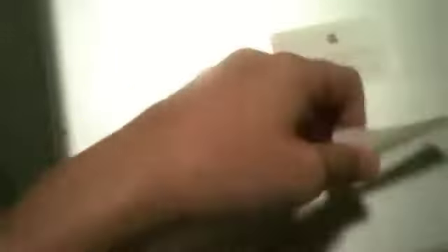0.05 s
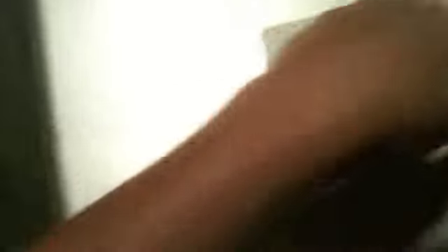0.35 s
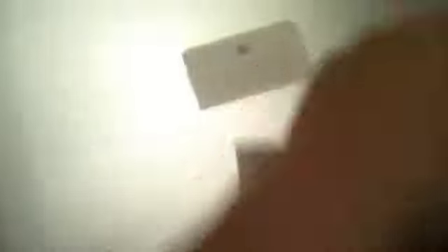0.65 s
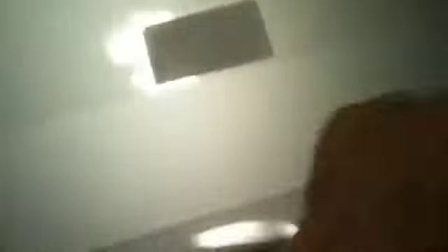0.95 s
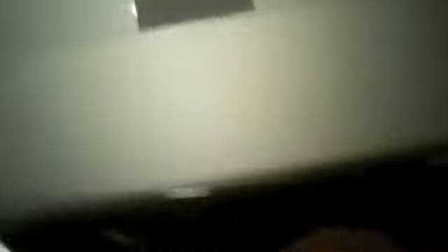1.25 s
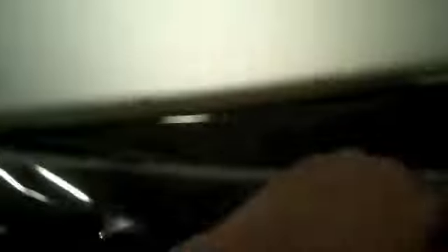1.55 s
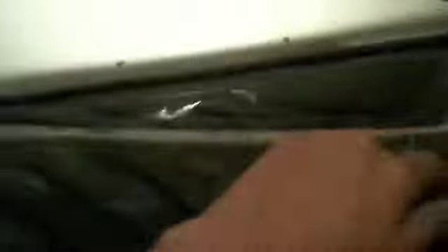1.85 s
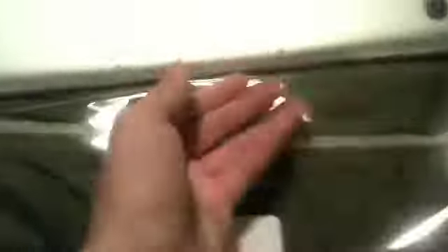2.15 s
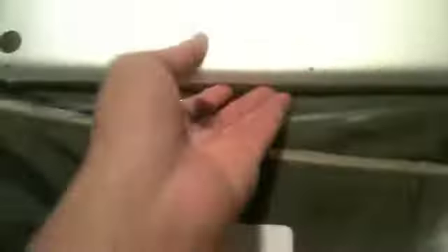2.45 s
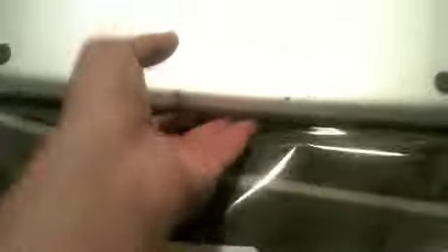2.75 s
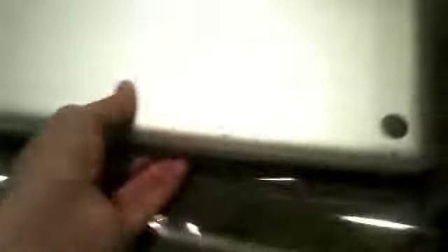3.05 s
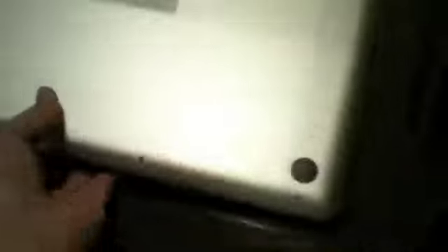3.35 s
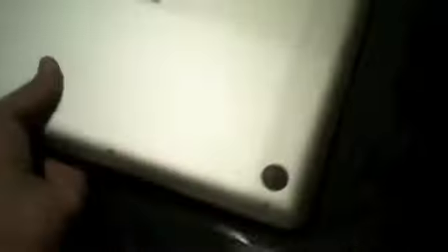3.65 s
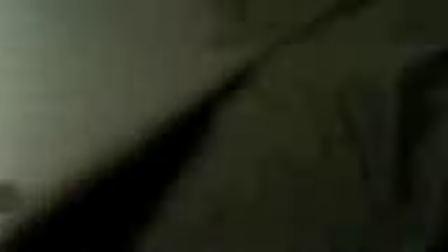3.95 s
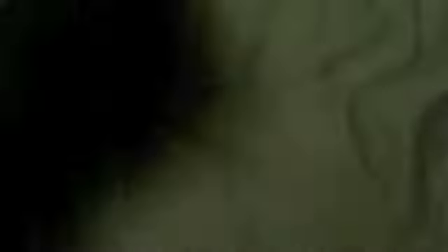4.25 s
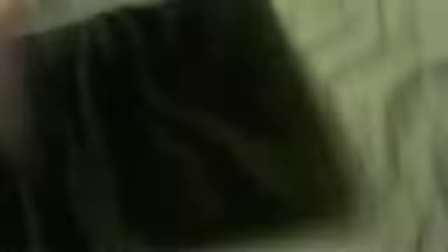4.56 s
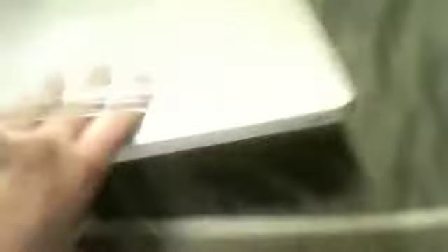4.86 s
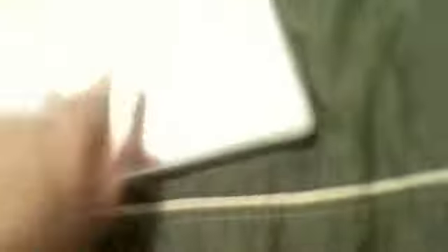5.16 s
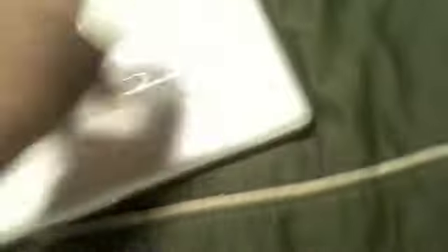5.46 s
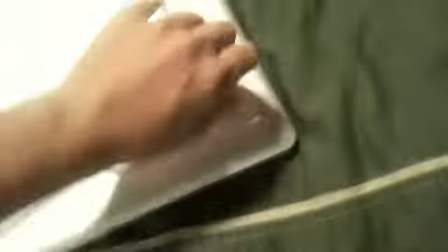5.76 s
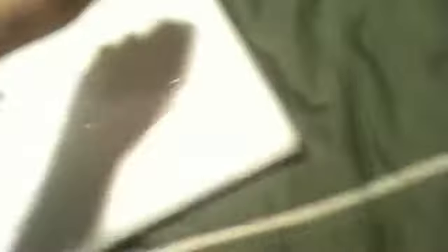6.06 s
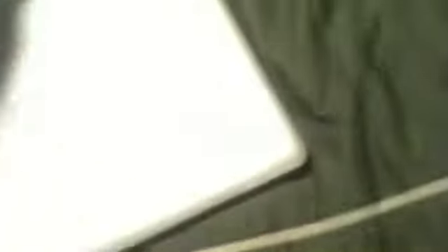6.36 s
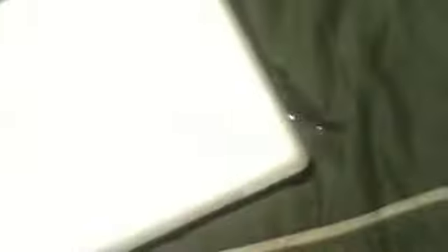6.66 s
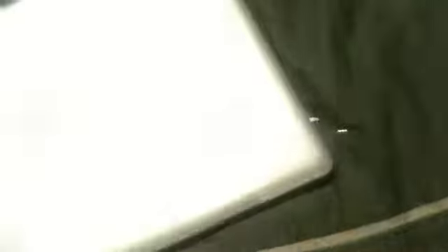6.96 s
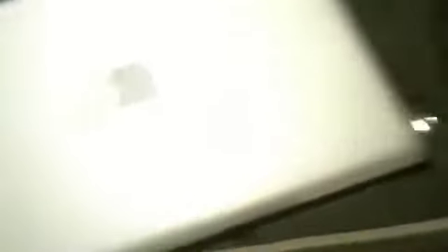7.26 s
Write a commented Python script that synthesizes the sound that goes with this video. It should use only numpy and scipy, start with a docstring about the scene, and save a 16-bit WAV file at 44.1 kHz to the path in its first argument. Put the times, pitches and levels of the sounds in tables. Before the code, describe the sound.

Three short sticky rips pull plastic film away from a laptop, mixed with bright, sharp cracks. Lighter scattered crinkles and a sliding hiss follow, pause briefly, then build into busy crackling as the case drags faintly on bedding. Fingers bump and tap the case with no ring. The sound is close and fairly dry in a small quiet room, and the loudest snaps slightly overload the microphone.

```python
"""Peeling protective film off a laptop

The laptop lies on a bed, close to a small microphone. The film's glued flap lets go in three stick-slip
rips; then the loose film snaps, crumples and slides, and fingers knock on the case. Hand movements bring
a hiss and a scatter of small creases. A small room answers, and the loudest cracks overload the mic."""
import sys
import numpy as np
from scipy import signal
from scipy.fft import rfft, irfft, next_fast_len
from scipy.io import wavfile
from scipy.ndimage import map_coordinates

SR = 44100
rng = np.random.default_rng(int(sys.argv[2]) if len(sys.argv) > 2 else 0)


def pcm_store(signal):
    """Save signal as 16-bit PCM."""
    levels = np.round(np.clip(np.atleast_2d(signal), -1, 1) * 32767)
    wavfile.write(sys.argv[1], SR, levels.astype(np.int16).T)


N = 322371
TIME = np.arange(N) / SR
GRAIN = 2048  # samples in one crease or knock
GRAIN_TIME, GRAIN_HZ = np.arange(GRAIN) / SR, np.fft.rfftfreq(GRAIN, 1 / SR)
TOP_HZ = 15900  # the microphone's band limit
SMALL_FLUTTER_DB = -17  # small creases leave little flutter behind

# the hands at work on the film: (start [s], end [s], typical crease [dB], sliding hiss [dB])
HAND_MOVES = [(0, 0.386, -66, -57), (0.455, 0.584, -50, -58.5), (.76, 0.898, -40.5, -51),
              (1.049, 1.195, -38, -54), (1.27, 1.486, -58, -54), (1.492, 1.656, -43.5, -60),
              (1.866, 2.733, -57.5, -68.5), (2.8, 4.03, -50, -59.5), (4.028, 4.164, -66, -54),
              (4.607, 4.982, -66, -61.5), (5.007, 5.22, -36, -50), (5.218, 5.46, -31.5, -43),
              (5.598, 5.72, -40, -53), (5.77, 5.876, -40.5, -54.5), (5.932, 6.161, -39.5, -56),
              (6.16, 7.034, -55.5, -71), (6.667, 6.707, -69, -49.5), (7.043, 7.307, -40, -47)]


def amp(db):
    """Decibels to gain."""
    return 10 ** (np.asarray(db) / 20)


def along(points, hz):
    """Read (frequency [Hz], value) points on a log frequency axis."""
    freqs, values = np.transpose(points)
    return np.interp(np.log(hz + 1), np.log(freqs), values)


def wobble(rate):
    """A smooth random curve with `rate` knots a second."""
    return map_coordinates(rng.standard_normal(int(N * rate / SR) + 4), [TIME * rate])


def filtered(x, gain):
    """Equalise x with the curve gain(hz)."""
    size = next_fast_len(N + SR // 2)
    return irfft(rfft(x, size) * gain(np.fft.rfftfreq(size, 1 / SR)), size)[:N]


def noise(spectrum):
    """Coloured noise of rms 1."""
    x = filtered(rng.standard_normal(N), lambda hz: amp(along(spectrum, hz)))
    return x / x.std()


def causal(gain):
    """The minimum-phase response with this gain: nothing rings ahead of the attack."""
    cepstrum = irfft(np.log(gain))
    index = np.arange(GRAIN)
    fold = 1 + np.sign(GRAIN / 2 - index) - (index == 0)
    return np.exp(rfft(cepstrum * fold))


def resonance(centre_hz, q):
    """One band-pass response for each centre frequency."""
    s = 1j * GRAIN_HZ / centre_hz[:, None]
    return s / q / (1 + s / q + s * s)


def placed(times, db, grains):
    """Lay grains out in time, each with the energy of 2 ms at its level."""
    gain = amp(db) * np.sqrt(.002 * SR / np.sum(grains ** 2, axis=1))
    index = np.round(np.abs(times) * SR).astype(int)[:, None] + np.arange(GRAIN)
    return np.bincount(index.ravel(), (grains * gain[:, None]).ravel(), N)[:N]


def room_tone():
    """The faint, low air of a quiet bedroom."""
    # colour of the air: (frequency [Hz], relative density [dB])
    air = [(30, -20.5), (80, -25.5), (150, 1), (330, -0.5), (700, -8.5), (2000, -15), (15500, -35)]
    return amp(-62) * noise(air)


def room(x, build_s=0.0045, count=8):
    """A short diffuse tail whose pattern changes as the film and microphone move."""
    # the room's decay: (frequency [Hz], time to fall 60 dB [s])
    decay = [(200, 0.12), (1500, 0.16), (6000, 0.14), (15000, 0.15)]
    hz, t, spectra = signal.stft(rng.standard_normal((count, SR // 3)), SR, nperseg=256)
    tails = signal.istft(spectra * amp(-60 * t / along(decay, hz)[:, None]), SR, nperseg=256)[1]
    tails *= 1 - np.exp(-np.arange(tails.shape[1]) / SR / build_s)
    tails /= np.linalg.norm(tails, axis=1, keepdims=True)
    position = (TIME * 10).astype(int) % count  # the next tail every 0.1 s
    return sum(signal.fftconvolve(x * (position == k), tail)[:N] for k, tail in enumerate(tails))


def dragging():
    """The case drags on the bedding with a grainy rustle."""
    # swell of the drag: (time [s], level [dB])
    swell = [(4.55, -83.5), (4.86, -55), (5.15, -57), (5.38, -55), (5.7, -60), (6, -80)]
    # colour of the rubbed cloth: (frequency [Hz], relative density [dB])
    cloth = [(60, -31.5), (300, -13), (800, -1.5), (1400, -8), (2500, -16.5), (9000, -27)]
    return amp(np.interp(TIME, *np.transpose(swell)) + 0.81 * wobble(68)) * noise(cloth)


def stroke(start, end, db, rise_db_per_s=700, fall_db_per_s=169):
    """The envelope of one hand movement: it rises quickly, holds, and dies as the film comes to rest."""
    early, late = np.maximum(start - TIME, 0), np.maximum(TIME - end, 0)
    return amp(db - rise_db_per_s * early - fall_db_per_s * late)


def sliding(resting_db=-73):
    """Film hisses over the smooth case with each stroke, and never lies quite still."""
    # colour of the hiss: (frequency [Hz], relative density [dB])
    hiss = [(200, -24.5), (1000, -6.5), (3000, -8), (6500, -3.5), (10000, -4.5), (15500, -17.5)]
    strokes = np.max([stroke(start, end, db) for start, end, _, db in HAND_MOVES], axis=0)
    flicker = amp(1.3 * wobble(18) + 1.2 * wobble(300))
    return np.hypot(strokes, amp(resting_db)) * flicker * noise(hiss)


def pushes(count, life_s):
    """Spectra of soft contacts: noise bursts that swell and die away."""
    return rfft(rng.standard_normal((count, GRAIN)) * np.sqrt(GRAIN_TIME) * np.exp(-GRAIN_TIME / life_s))


def bumps():
    """The hands bump the padded case with a dull thud."""
    # soft bumps: (time [s], pitch [Hz], level [dB])
    thuds = [(1.475, 387, -38.5), (1.625, 263, -42.5), (1.879, 290, -35.5), (4.028, 427, -38.5),
             (5.38, 330, -34), (6.334, 263, -28.5), (6.929, 565, -41), (7.128, 1590, -25.5)]
    times, hz, db = np.transpose(thuds)
    return placed(times, db, irfft(pushes(len(times), life_s=0.0044) * resonance(hz, q=1.47) ** 2))


def knocks(crest_db=7):
    """A finger meets the case: a short dull tap with no ring."""
    # finger taps: (time [s], nominal peak [dB])
    taps = [(4.028, -24.5), (5.709, -21), (6.337, -18), (6.403, -21), (6.473, -32), (7.033, -18.5)]
    # tone of the knocked case: (frequency [Hz], gain [dB])
    case_tone = [(35, -25), (60, -17.5), (148, -1), (895, 6), (1030, 9), (1960, -1.5), (3340, -0.5),
                 (4110, -5.5), (7330, -2), (15000, -17)]
    times, peak_db = np.transpose(taps)
    case = causal(amp(along(case_tone, GRAIN_HZ)))
    return placed(times, peak_db - crest_db, irfft(pushes(len(times), life_s=0.0021) * case))


def jolts(count, life_s, flutter_db, flutter_s=0.0036):
    """Spectra of sudden releases of tension, each followed by a weaker flutter of the sheet."""
    lives = np.reshape(life_s, (-1, 1)) * np.exp(0.44 * rng.standard_normal((count, 1)))
    age = GRAIN_TIME / lives
    release = 2 * np.sqrt(age) * np.exp(-age)
    flutter = amp(flutter_db) * np.exp(-GRAIN_TIME / flutter_s)
    return rfft(rng.standard_normal((count, GRAIN)) * (release + flutter))


def creases(times, db, ring_hz, flex_db, life_s, q, broad_db, flutter_db):
    """Each crease cracks, rings briefly at its own pitch and flexes the sheet around it."""
    # the film's broad crack: (frequency [Hz], gain [dB])
    crack_tone = [(300, -27), (2600, -7.5), (3800, 0), (4700, -1.5), (6700, 2), (10500, 0), (12300, -4),
                  (14300, 0.5), (15600, -9.5), (17500, -27)]
    # the low body of the flexing sheet: (frequency [Hz], gain [dB])
    flex_tone = [(50, -5), (130, -8.5), (280, 2), (1100, 0), (2000, -3), (3500, -6), (8000, -30.5)]
    count = len(times)
    band_limit = causal(1 / np.sqrt(1 + (GRAIN_HZ / TOP_HZ) ** 20))
    ring = jolts(count, life_s, flutter_db) * resonance(ring_hz, q) * band_limit
    crack = jolts(count, life_s, flutter_db) * causal(amp(along(crack_tone, GRAIN_HZ)))
    sheet = causal(amp(along(flex_tone, GRAIN_HZ)))
    flex = jolts(count, life_s=0.00088, flutter_db=-8, flutter_s=0.013) * sheet
    return placed(times, db, irfft(ring + amp(broad_db) * crack)) + placed(times, flex_db, irfft(flex))


def crumpling(per_s=110, spread_db=6, ring_hz=6000, flex_db=-8):
    """Many small creases give way at random while the fingers gather the film."""
    times = np.sort(rng.uniform(0, N / SR, int(per_s * N / SR)))
    db = np.full(len(times), -90.)  # near silence between movements
    for start, end, typical_db, _ in HAND_MOVES:
        db[(times > start) & (times < end)] = typical_db
    pitch, flex = np.clip(rng.standard_normal((len(times), 2)), -1.6, 1.6).T
    # most creases are tiny, a few stand out
    db += spread_db * (np.minimum(rng.exponential(size=len(times)), 2.3) - 1)
    return creases(times, db, ring_hz * np.exp(.42 * pitch), db + flex_db + 3 * flex,
                   life_s=.00025, q=3.3, broad_db=-17, flutter_db=SMALL_FLUTTER_DB)


def snaps(crest_db=12, flex_gain_db=4, neighbour_db=-13, slowing=0.69):
    """Single creases pop through as the film bends; a weaker neighbour goes at nearly the same moment."""
    # the loudest buckles: (time [s], nominal peak [dB], film ring [Hz], sheet flex before its gain [dB])
    buckles = [(0.0074, -10.5, 6450, -37), (0.2316, -24, 4400, -42), (0.4408, -23, 3810, -54),
               (0.4782, -11.5, 7000, -49), (0.5176, -14.5, 4930, -47), (0.6336, -10, 9000, -42),
               (0.7878, -7.5, 13500, -46), (0.841, -3, 7560, -50), (1.0658, -8.5, 6950, -43.5),
               (1.1217, -20, 2580, -46), (1.3702, -22, 3570, -42), (1.495, -3.5, 13300, -35.5),
               (1.5776, -19.5, 6360, -42.5), (1.6179, -15.5, 9200, -53), (1.7076, -2, 5800, -36.5),
               (1.7119, 5, 6630, -28.5), (1.9014, -20, 10200, -40), (2.0452, -22, 4640, -48),
               (2.2372, -24, 5470, -47.5), (2.4286, -27.5, 4150, -45), (2.5048, -28, 8700, -59),
               (2.589, -16, 8100, -59), (2.631, -18.5, 6260, -50), (2.647, -17, 13800, -42),
               (2.7724, -11, 9180, -44.5), (2.8342, -20, 6750, -46), (2.9939, -21.5, 3170, -41),
               (3.031, -11, 7100, -48.5), (3.1952, -23, 5700, -44.5), (3.241, -12.5, 7800, -55),
               (3.3243, -17, 8500, -43.5), (3.4349, -20.5, 4430, -53), (3.6282, -6, 4020, -46),
               (3.807, -22.5, 8300, -54), (3.899, -23.5, 3800, -46.5), (4.357, -25.5, 5430, -44),
               (4.7076, -20, 7400, -42.5), (4.7445, -11.5, 11300, -38.5), (4.9861, -17.5, 6460, -52),
               (5.069, -10.5, 10000, -47), (5.085, -7.5, 8760, -39.5), (5.1149, -5.5, 9600, -33.5),
               (5.23, -10, 9220, -33.5), (5.244, -8, 8240, -36), (5.2604, -3.5, 8700, -44),
               (5.2977, -11.5, 11200, -59), (5.3461, -4, 7200, -33), (5.3683, -8, 8500, -33.5),
               (5.47, -8, 8000, -37), (5.5082, -14, 3020, -37), (5.693, -13.5, 6500, -42),
               (5.79, -20.5, 6500, -69), (5.8271, -14.5, 8900, -45), (5.9346, -18, 4850, -45),
               (6.0068, -12.5, 6300, -39.5), (6.0509, -5, 3650, -36.5), (6.0587, -6, 4900, -30.5),
               (6.0741, -4.5, 3400, -26.5), (6.122, -13.5, 8350, -29.5), (6.8625, -11, 7050, -38.5),
               (6.989, -29.5, 7010, -46), (7.1133, -5.5, 7900, -32.5), (7.129, -7, 6000, -40),
               (7.197, -7.5, 6100, -41), (7.2243, -7, 8600, -38)]
    times, peak_db, hz, sheet_db = np.transpose(buckles)
    db, flex_db = peak_db - crest_db, sheet_db + flex_gain_db
    # slack film flexes more than it cracks, and folds more slowly
    slack = amp(slowing * np.clip(flex_db - db + 12.5, 0, 20))
    pop = creases(times, db, hz, flex_db, life_s=0.0002 * slack, q=3.8, broad_db=-6, flutter_db=-16.5)
    lag, size, pitch = np.clip(rng.standard_normal((len(times), 3)), -1.5, 1.5).T
    offset_s, weaker_db = .0025 * (lag + .5), neighbour_db + 2 * size
    neighbour = creases(times + offset_s, db + weaker_db, hz * np.exp(.2 * pitch), flex_db + weaker_db,
                        life_s=0.0003 * slack, q=1.8, broad_db=-11.5, flutter_db=SMALL_FLUTTER_DB)
    return pop + neighbour


def rips(flex_db=-30):
    """The glue holds and lets go a few hundred times a second, at uneven intervals."""
    # one curve per rip: (time [s], slip rate [1/s], slip level [dB], film ring [Hz])
    peels = [
        [(.0475, 412, -19, 4550), (.052, 440, -1.5, 6100), (.072, 258, -17, 6160)],
        [(.647, 148, -5, 8930), (.66, 270, -15, 9200), (.71, 370, -10, 8250), (.746, 390, -13.5, 7700)],
        [(1.1803, 400, -17, 8910), (1.207, 201, -16, 8040), (1.228, 300, -15, 6140), (1.249, 290, -17, 6500)],
    ]
    slips = []
    for peel in peels:
        knots, rate, db, hz = np.transpose(peel)
        now = knots[0]
        while now < knots[-1]:
            slip_db = np.interp(now, knots, db) + rng.normal(0, 1)
            ring_hz = np.interp(now, knots, hz) * np.exp(rng.normal(0, 0.065))
            slips.append((now, slip_db, ring_hz))
            now += np.exp(rng.normal(0, .22)) / np.interp(now, knots, rate)
    times, db, hz = np.transpose(slips)
    # the taut flap flexes equally on every slip, however sharp the crack
    return creases(times, db, hz, flex_db, life_s=0.00024, q=4.1, broad_db=-7.5, flutter_db=-6.5)


def scene():
    """Film and hands in a bedroom; the loose film is nearer than the glued flap, so a touch drier."""
    on_case = rips() + bumps() + knocks()
    loose_film = snaps() + crumpling()
    reverb = amp(-6.5) * room(on_case + amp(-0.5) * loose_film)
    return (on_case + loose_film + reverb + sliding() + dragging() + room_tone())[None]


def record(dry, ceiling=.62, bass_hz=80):
    """The microphone flattens the loudest peaks, thins the bass and cuts off at its band limit."""
    oversampled = signal.resample_poly(dry[0], 2, 1)
    clipped = oversampled / (1 + (oversampled / ceiling) ** 10) ** (1 / 10)
    low_cut = signal.butter(1, bass_hz, "high", fs=SR)
    thin = signal.lfilter(*low_cut, signal.resample_poly(clipped, 1, 2))
    return filtered(thin, lambda hz: np.clip((TOP_HZ - hz) / 600 + .5, 0, 1))[None]


dry = scene()
out = record(dry)
pcm_store(out)
```